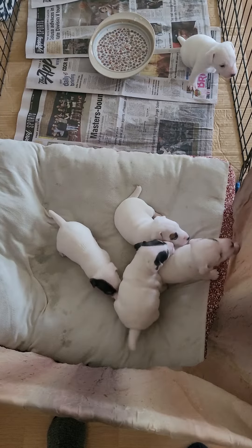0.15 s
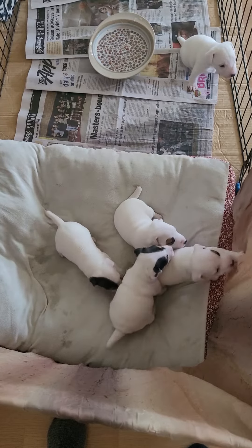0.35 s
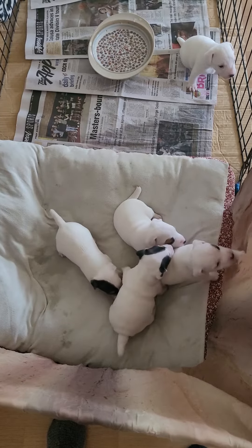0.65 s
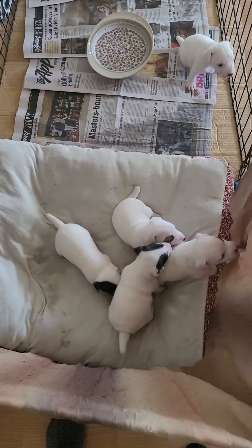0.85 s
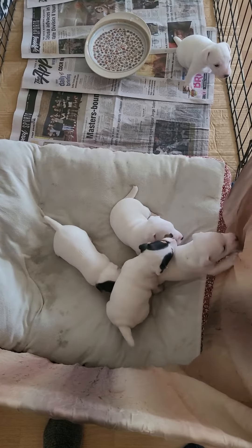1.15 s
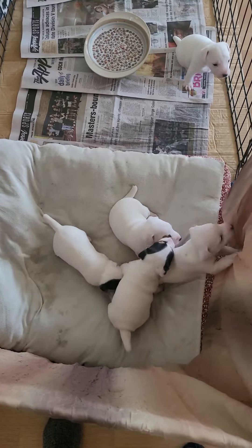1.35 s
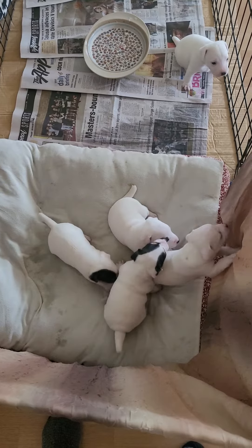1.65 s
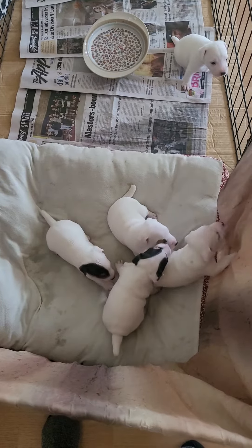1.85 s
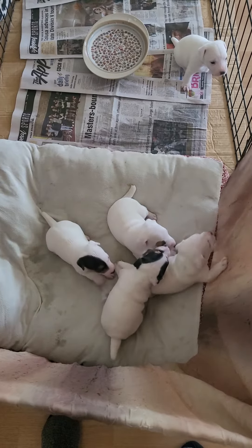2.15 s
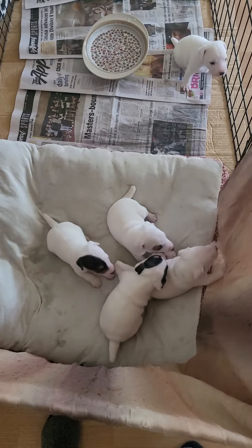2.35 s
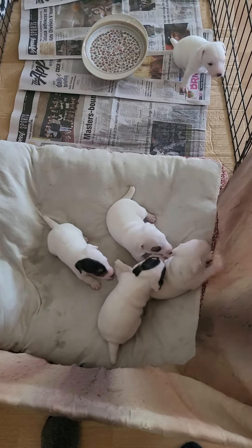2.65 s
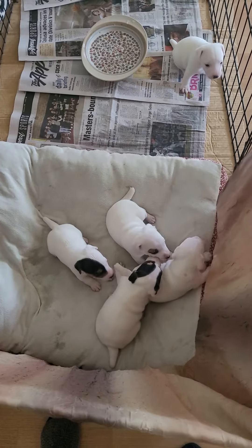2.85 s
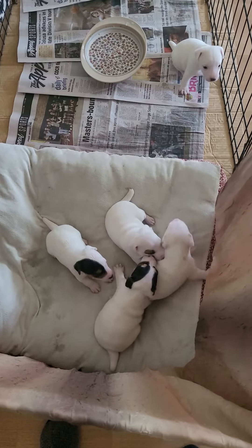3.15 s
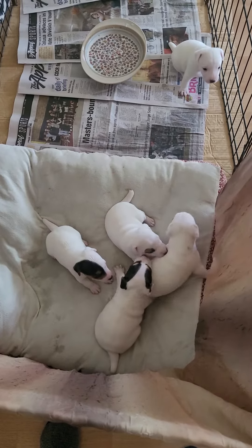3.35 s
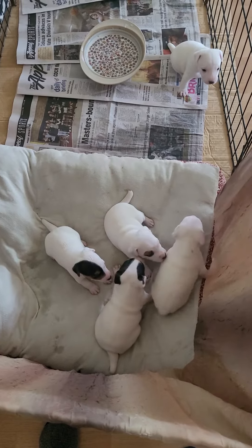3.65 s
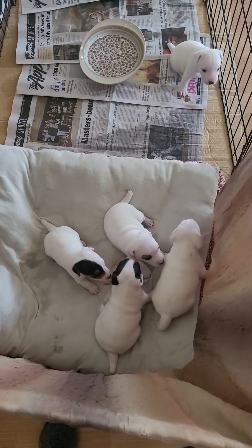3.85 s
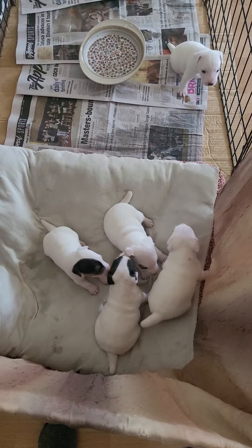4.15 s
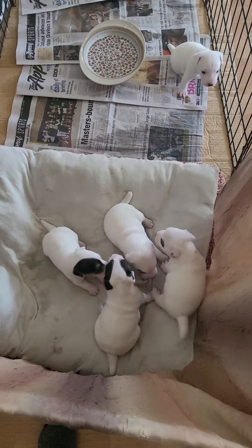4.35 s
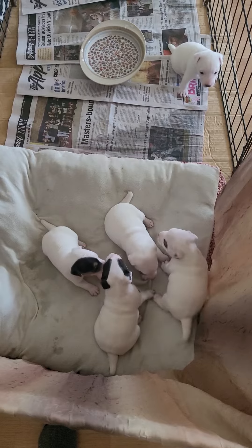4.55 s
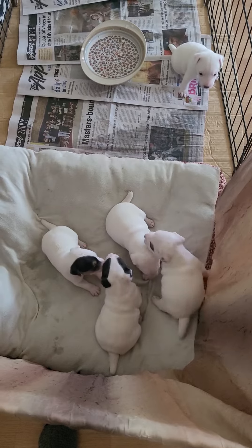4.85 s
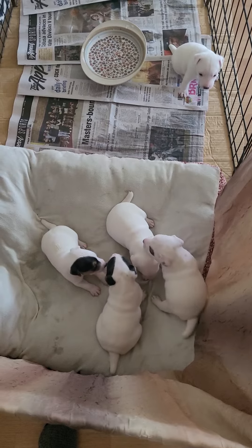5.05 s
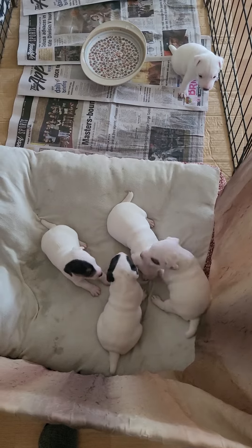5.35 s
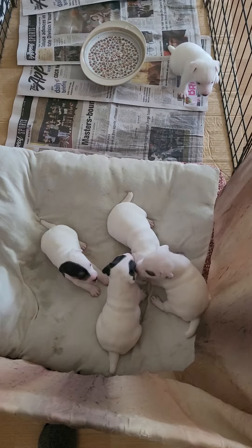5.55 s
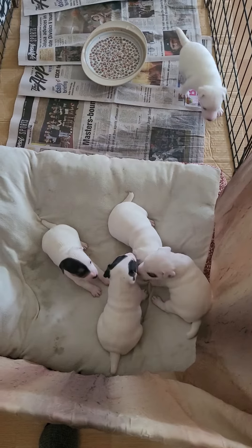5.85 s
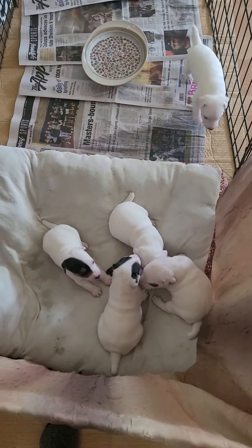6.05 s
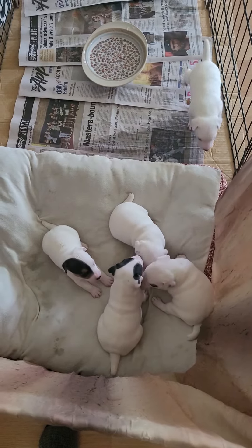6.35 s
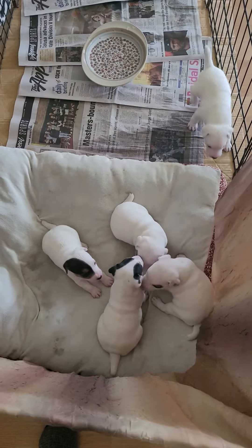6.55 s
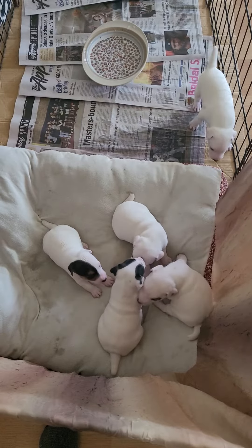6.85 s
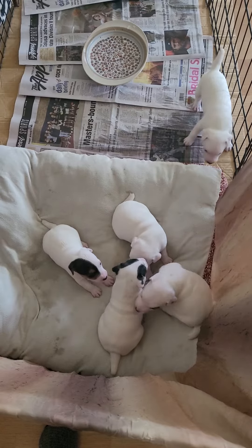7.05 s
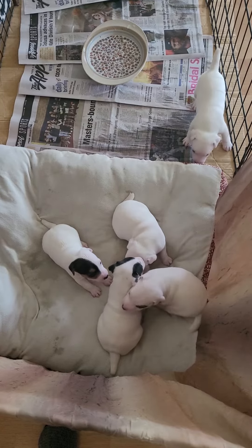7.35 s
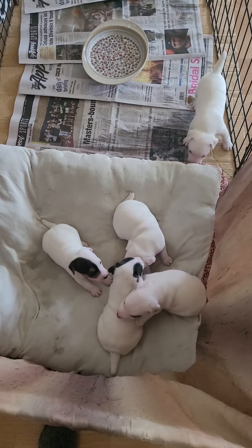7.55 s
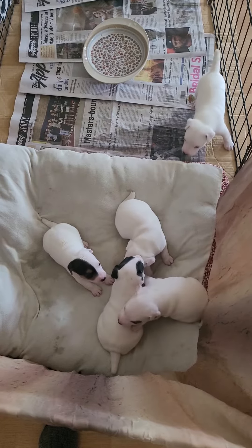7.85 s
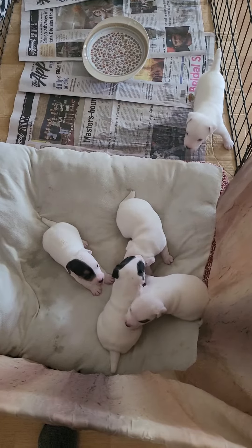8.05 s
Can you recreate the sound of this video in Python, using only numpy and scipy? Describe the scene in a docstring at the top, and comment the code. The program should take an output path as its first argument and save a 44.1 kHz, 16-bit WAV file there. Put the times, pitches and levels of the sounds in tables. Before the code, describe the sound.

Several young puppies whimper close to a phone's stereo microphone in a quiet indoor pen. Tiny pure squeaks come singly and in flurries, some stretching into short wavering whines; the strongest rises and drops just after three seconds. Later come low grunts, soft huffs, scuffs on cushion and newspaper, and small dry ticks. More whimpers close the stretch over a low, faintly hissing room hum.

```python
"""Young puppies whimper through the nose in short whistling notes, close to a phone's two microphone ports.
They lie on a cushion in an indoor pen. Each whimper is a near-pure tone with octave, overtones and breath hiss.
Low grunts are rough harmonics; huffs, scuffs on cloth and newspaper and small ticks are shaped noise.
Behind them a quiet room hums, and its walls answer the pups with a short decaying tail."""
import sys
import numpy as np
from scipy import signal
from scipy.fft import rfft, irfft, next_fast_len
from scipy.io import wavfile
from scipy.ndimage import uniform_filter1d, map_coordinates

SR = 44100
rng = np.random.default_rng(int(sys.argv[2]) if len(sys.argv) > 2 else 0)


def pcm_store(signal):
    """Save signal as 16-bit PCM."""
    levels = np.round(np.clip(np.atleast_2d(signal), -1, 1) * 32767)
    wavfile.write(sys.argv[1], SR, levels.astype(np.int16).T)


N = 361619
TIME = np.arange(N) / SR
TOP_HZ = 15830  # band limit of voices and microphone

# whimpers, one curve each: time_s [s], pitch_hz [Hz], level_db [dB]
WHIMPERS = [
    [(0.006, 1039, -48), (0.028, 965, -44), (0.04, 956, -48)],
    [(0.216, 861.5, -39), (0.243, 853, -37.5), (0.256, 840, -47.5)],
    [(1.614, 989, -48.5), (1.634, 926, -41), (1.646, 918, -49)],
    [(1.868, 952.6, -50), (1.892, 936, -43.5), (1.903, 926, -34)],
    [(2.454, 981, -50.5), (2.474, 1022, -56), (2.484, 988, -55)],
    [(3.834, 1215, -47.5), (3.844, 1162, -43.5), (3.864, 1057, -47.5)],
    [(3.868, 1108, -45), (3.88, 1090, -50), (3.893, 1070, -54)],
    [(4.396, 890, -36.5), (4.402, 857, -39), (4.414, 913, -61)],
    [(4.835, 907, -52.5), (4.846, 858, -48), (4.88, 842, -51)],
    [(6.094, 864, -49.5), (6.108, 835, -51.5), (6.14, 824, -48)],
    [(1.81, 1163, -50.5), (1.83, 1128, -48), (1.866, 1037, -49)],
    [(3.908, 1140, -52.5), (3.938, 1232, -43.5), (3.972, 1088, -50.5)],
    [(3.981, 1130, -47.5), (4.009, 1125, -46.5), (4.035, 968, -49.5)],
    [(5.815, 1190, -73), (5.839, 1069, -56.5), (5.858, 1213, -65)],
    [(7.544, 1242, -41.5), (7.562, 1009, -34), (7.597, 1098, -42)],
    [(7.768, 1124, -38), (7.784, 924.4, -35), (7.812, 971, -37)],
    [(5.866, 1670, -79.5), (5.88, 1563, -58), (5.905, 1570, -70.5)],
    [(2.077, 1221, -46.5), (2.1, 1212, -41.5), (2.14, 1297, -40.5), (2.162, 1246, -39), (2.178, 1175, -42),
     (2.206, 1193, -42.5)],
    [(2.486, 1025, -42.5), (2.522, 1303, -41), (2.555, 1247, -40.5), (2.61, 1393, -40),
     (2.675, 1369, -38.5), (2.694, 1321, -42.5)],
    [(3.546, 1261, -47.5), (3.575, 1273, -42), (3.6, 1369, -39), (3.63, 1330, -39), (3.645, 1164, -47),
     (3.655, 1134, -44.5)],
    [(4.2, 1160, -54), (4.24, 1103, -46), (4.275, 1170, -48), (4.3, 1046, -42.5), (4.33, 1001, -43.5),
     (4.35, 864, -50)],
    [(7.997, 897, -43), (8.012, 785, -46), (8.035, 887, -35), (8.062, 1135, -37), (8.074, 1163, -37),
     (8.086, 953, -45)],
    [(2.886, 1405, -44), (2.91, 1480, -39.5), (2.935, 1661, -45), (2.99, 1677, -44), (3.05, 1709, -38.5),
     (3.074, 1675, -40), (3.085, 1377, -43)],
    [(3.236, 1477, -43.5), (3.26, 1651, -35.5), (3.295, 1769, -34.5), (3.335, 1717, -31.5),
     (3.366, 1650, -29.5), (3.381, 1540, -33.5), (3.394, 1302, -38.5)],
    [(5.418, 1618, -50.5), (5.44, 1636, -45.5), (5.45, 1730, -49.5), (5.46, 1768, -41.5), (5.47, 1797, -52),
     (5.482, 1810, -46.5), (5.497, 1770, -56)],
    [(7.132, 1320, -54), (7.19, 1457, -50.5), (7.22, 1575, -45.5), (7.238, 1535, -50), (7.252, 1622, -41),
     (7.28, 1673, -40.5), (7.322, 1692, -45)],
]
# voice of each whimper in order of time: left_minus_right_db [dB], octave_db over the nose's rule [dB],
# high_overtones_db [dB]
WHIMPER_VOICES = [(-1.5, 5, -56.5), (-2.5, -13, -56), (-2, -5, -63), (-2.5, -3, -62.5), (-3, -1.5, -68.5),
                  (2, -2.5, -55.5), (-3.5, 9.5, -57), (3, 6, -57.5), (0, 1.5, -51), (2, -2.5, -49),
                  (3, 2.5, -58), (2.5, -11, -66), (-3.5, -4, -70), (3, -1.5, -63.5), (3.5, -2, -63.5),
                  (2.5, -5, -65), (-3, -15.5, -70), (-3, -18, -76.5), (-2.5, 7, -56), (-9, -18, -73),
                  (-2, -3, -55), (-2.5, -16, -72), (-7.5, 4.5, -58), (-7.5, 1, -57.5), (-8.5, 0.5, -56),
                  (-5.5, -3, -60)]
# octave's level against the fundamental: octave_hz [Hz], gain_db [dB]
NOSE_OCTAVE = [(1500, -1), (2050, -14), (2500, -27.5), (3500, -35.5)]
# colour of the high overtones: freq_hz [Hz], gain_db [dB]
NOSTRIL_OVERTONES = [(3180, -66), (5400, -23.5), (6600, 0.5), (6970, -7.5), (8400, -26.5), (10300, -5.5),
                     (11700, -9), (12800, -12), (14800, -4), (16000, -13)]
# colour of the breath hiss: freq_hz [Hz], gain_db [dB]
BREATH_COLOUR = [(1000, -2), (2100, -14.5), (3000, -18.5), (5200, -20.5), (6700, 0), (8600, -25.5),
                 (10800, -1.5), (12600, -5), (14600, -2)]
WHIMPER_ATTACK_S, WHIMPER_RELEASE_S = .009, .009
LAG_S_PER_DB = -.000012  # the quieter port hears it later
# hiss over the overtones of a 1200 Hz cry; high cries leak less air
BREATH_DB, BREATH_DB_PER_OCTAVE = -2.5, -13


def whimpers():
    """A nearly pure whistle with its octave; the narrow nostrils add high overtones and breath hiss."""
    out, airflow = np.zeros((2, N)), np.zeros(N)
    for rows, (pan_db, octave_db, high_db) in zip(sorted(WHIMPERS), WHIMPER_VOICES):
        first, fade, hz, db = phrase(rows, WHIMPER_ATTACK_S, WHIMPER_RELEASE_S)
        size = len(hz)
        span = slice(first, first + size)
        hz = hz * (1 + .005 * wobble(50, size))
        db = db + 1.1 * wobble(55, size)
        effort_db = db - db.max()

        tone, octave = overtones(hz, NOSE_OCTAVE, jitter=.007, count=2)
        # turbulence smears the tone a little and the octave more
        tone *= (1 + .1 * wobble(400, size)) / amp(along(NOSE_OCTAVE, hz))
        octave *= amp(octave_db + .4 * effort_db) * (1 + .5 * wobble(350, size))

        flicker = np.array([amp(5 * wobble(45, size)) for _ in range(20)])
        high = flicker * overtones(hz, NOSTRIL_OVERTONES, jitter=.0045, count=20)
        high = high[2:].sum(0)  # third harmonic and up
        # the overtones follow the effort less steeply than the tone does
        high = amp(high_db + 0.59 * effort_db) * unit(high)

        cry = fade * (amp(db) * (tone + octave) + high)
        out[:, span] += placed(cry, pan_db, lag_s=LAG_S_PER_DB * pan_db)
        leak_db = BREATH_DB + BREATH_DB_PER_OCTAVE * np.log2(hz.mean() / 1200)
        airflow[span] = amp(high_db + leak_db + 0.12 * effort_db)

    # air leaks a little before the folds start and for a moment after they stop
    linger = np.exp(-TIME[:SR // 10] / .016)
    airflow = signal.fftconvolve(airflow, linger / linger.sum())[300:N + 300]
    airflow = uniform_filter1d(airflow, size=SR // 40)
    hiss = patchy(noise(BREATH_COLOUR, (2, N)), 2.5, bins=16, frames=6)
    return out + airflow * amp(2 * wobble(23, N)) * hiss


# low grunts and moans, one curve each: time_s [s], pitch_hz [Hz], level_db [dB]
GRUNT_CURVES = [
    [(.9, 365, -81), (1.0, 551, -63.5), (1.08, 695, -67.5), (1.14, 782, -69.5), (1.22, 825, -74)],
    [(2.39, 315, -69.5), (2.45, 304, -61)],
    [(3.085, 348, -61), (3.113, 394, -59.5), (3.165, 296.5, -60.5), (3.197, 316, -59), (3.239, 404, -54),
     (3.267, 384, -55), (3.337, 405, -51), (3.365, 343.3, -61.5), (3.393, 269, -62), (3.42, 218, -57)],
    [(5.185, 286, -69.5), (5.227, 278, -64.5)],
    [(5.24, 278.6, -64), (5.295, 274, -65.5)],
    [(5.313, 359.5, -59), (5.364, 385, -65)],
    [(5.735, 291, -68.5), (5.8, 269.4, -61), (5.845, 310, -57.5)],
    [(5.878, 394, -61), (5.895, 348, -56.5), (5.912, 420, -53)],
    [(6.31, 365, -68), (6.354, 341, -64.5)],
    [(6.385, 393, -54), (6.447, 376, -53)],
    [(6.441, 359, -61.5), (6.489, 366, -53.5)],
]
# one value per grunt: overtone_tilt [dB per octave]
GRUNT_TILTS = [5.5, -8, -2.5, -2, -0.5, -4, -3, -1.5, -1.5, -8.5, -3.5]
# colour given by chest and throat: freq_hz [Hz], gain_db [dB]
CHEST_COLOUR = [(250, 4), (310, 8), (420, -13.5), (560, -2), (850, -4), (1200, -20), (1800, -27.5),
                (2300, -45)]
GRUNT_FADE_S, GRUNT_WAVERS_DB = .014, 1.5
GRUNT_ROUGH = .45  # 0-1


def grunts():
    """Closed-mouth murmurs: soft harmonics through chest and throat, a little rough."""
    out = np.zeros(N)
    for rows, tilt_db in zip(GRUNT_CURVES, GRUNT_TILTS):
        first, fade, hz, db = phrase(rows, GRUNT_FADE_S, GRUNT_FADE_S)
        size = len(hz)
        tilt = amp(tilt_db * np.log2(np.arange(1, 8)))[:, None]
        # each overtone comes and goes
        tilt = tilt * [amp(7 * GRUNT_ROUGH * wobble(45, size)) for _ in tilt]
        harmonics = overtones(hz, CHEST_COLOUR, jitter=.06 * GRUNT_ROUGH, count=7)
        voice = (tilt * harmonics).sum(0) * amp(6 * GRUNT_ROUGH * wobble(120, size))
        level = amp(db + GRUNT_WAVERS_DB * wobble(26, size))
        out[first:first + size] += fade * level * voice
    return placed(out, -0.41, lag_s=-0.000092)


# voiceless huffs and croaks: start_s [s], length_s [s], level_db [dB], centre_hz [Hz], width_hz [Hz]
HUFF_EVENTS = [(1.566, 0.15, -61.5, 624, 525), (4.393, 0.041, -54, 570, 515), (4.457, 0.051, -51, 827, 900),
               (5.315, 0.11, -67, 1890, 1020), (6.616, 0.15, -65.5, 910, 536), (6.882, 0.18, -65, 884, 300)]


def huffs():
    """Air pushed out without a tone: lumpy noise in one throat resonance."""
    out = np.zeros(N)
    for start_s, length_s, db, centre_hz, width_hz in HUFF_EVENTS:
        size = round(length_s * SR)
        air = rng.standard_normal(size) * amp(2.5 * wobble(110, size))
        air = filtered(air, lambda hz: 1 / (1 + ((hz - centre_hz) / (width_hz / 2)) ** 2) ** 2)
        fade = signal.windows.tukey(size, .6)
        out[round(start_s * SR):][:size] += amp(db) * fade * unit(air)
    return placed(out, -0.78, lag_s=.00005)


# claw and mouth ticks: start_s [s], level_db before rise and decay [dB], centre_hz [Hz]
TICK_EVENTS = [(1.0223, -44.5, 2060), (2.0677, -56, 2560), (2.4046, -56.5, 13480), (2.6278, -48, 2540),
               (2.6614, -51.5, 2720), (2.7516, -53, 13650), (4.9726, -54, 5750), (5.564, -52, 4466),
               (5.6131, -42.5, 13000), (5.7797, -54.5, 14640), (6.2745, -57.5, 6220), (6.327, -52.5, 3960),
               (6.349, -45.5, 3800), (6.36, -45, 3800), (6.4974, -54.5, 11500), (8.074, -48.5, 13530),
               (7.717, -57, 3230)]
# band over its centre, dying time, rise
TICK_WIDTH, TICK_T60_S, TICK_RISE_S = .5, .016, .0012


def ticks():
    """Each tick is a dry crack of noise, strongest in a wide band round its centre."""
    out, t = np.zeros(N + SR), TIME[:SR // 50]
    for start_s, db, centre_hz in TICK_EVENTS:
        half_width_hz = TICK_WIDTH * centre_hz / 2
        crack = filtered(rng.standard_normal(len(t)),
                         lambda hz: 0.051 + 1 / (1 + ((hz - centre_hz) / half_width_hz) ** 2))
        envelope = amp(db - 60 * t / TICK_T60_S) * (1 - np.exp(-t / TICK_RISE_S))
        out[round(start_s * SR):][:len(t)] += envelope * unit(crack)
    out = filtered(out, lambda hz: 1 / (1 + (1500 / (hz + 1)) ** 4))  # thin out the lows
    return placed(out[:N], -9.0, lag_s=-0.000035)


# scuffs on the bedding: start_s [s], length_s [s], cloth_db [dB], paper_db [dB]
SCUFF_EVENTS = [(0.074, 0.26, -60.5, -78.5), (1.219, 0.17, -66, -74), (1.745, 0.27, -65.5, -66),
                (3.948, 0.19, -66.5, -72), (4.319, 0.204, -78, -62), (4.819, .18, -83.5, -70),
                (5.302, 0.15, -67.5, -85), (5.456, 0.28, -71.5, -60), (5.61, 0.053, -78, -51.5),
                (5.758, 0.11, -66, -60.5), (5.954, 0.036, -64, -50), (6.074, 0.17, -80.5, -64),
                (6.291, 0.16, -70, -63), (6.486, 0.12, -66, -59), (6.613, 0.16, -65, -65.5),
                (7.323, 0.05, -91, -60.5), (8.149, 0.046, -65, -65)]
# colour of rubbed cloth: freq_hz [Hz], gain_db [dB]
CLOTH_COLOUR = [(880, -36), (1500, -10), (2590, -18.5), (3770, -14), (5600, -22.5), (7280, -27),
                (12300, -120)]
# colour of rubbed newspaper: freq_hz [Hz], gain_db [dB]
PAPER_COLOUR = [(3060, -38), (5200, -2.5), (7680, 4), (8400, -5), (14300, 5.5), (16000, -5)]
SCUFF_RISE, SCUFF_FADE_DB = .42, 12  # share of the length spent rising, loss over the whole


def shuffling():
    """Paws and bellies rub the bedding: each scuff rises, then fades, as noise broken into clumps of grains."""
    cloth, paper = np.zeros((2, N))
    for start_s, length_s, cloth_db, paper_db in SCUFF_EVENTS:
        first, t, elapsed, fade = note(start_s, length_s, SCUFF_RISE * length_s, length_s / 2)
        stroke = fade * amp(-SCUFF_FADE_DB * elapsed)
        cloth[first:first + len(t)] += amp(cloth_db) * stroke
        paper[first:first + len(t)] += amp(paper_db) * stroke
    grains = unit(amp(1.5 * wobble(45, N) + 2.5 * wobble(500, N)))
    rub = cloth * noise(CLOTH_COLOUR, (2, N)) + paper * noise(PAPER_COLOUR, (2, N))
    return patchy(grains * rub, 3, bins=12, frames=5)


# decay of the pen's room: freq_hz [Hz], t60_s [s]
ROOM_DECAY = [(1000, 0.34), (2000, 0.36), (7000, 0.075), (15000, 0.3)]


def room(x):
    """Each frequency of the walls' answer dies at its own speed."""
    hz, t, z = signal.stft(rng.standard_normal((2, SR * 2 // 3)), SR, nperseg=256)
    decay = amp(-60 * t / along(ROOM_DECAY, hz)[:, None])
    tail = signal.istft(z * decay, SR, nperseg=256)[1]
    late = np.pad(x.mean(0), (300, 0))[None]  # the answer starts 300 samples late
    return signal.fftconvolve(late, tail / np.linalg.norm(tail[0]), axes=1)[:, :N]


# colour of the room and microphone floor: freq_hz [Hz], gain_db [dB]
FLOOR_COLOUR = [(21, -20), (39, -12), (50, 2.5), (100, -4.5), (250, -2.5), (331, -5), (627, -20.5),
                (830, -21.5), (2490, -36.5), (5210, -40.5), (6550, -32.5), (8670, -39.5), (13700, -33.5),
                (16000, -37)]
# left-right likeness of the floor: freq_hz [Hz], likeness [0-1]
FLOOR_LIKENESS = [(60, 0.99), (300, 0.87), (700, 0.68), (1400, 0.27), (15000, 0.041)]
# the rumble grows briefly: peak_s [s], gain_db [dB]
RUMBLE_SWELLS = [(.68, 9), (1.57, 12), (1.9, 10), (2.12, 5.5), (3.35, 10), (4.0, 11), (4.47, 9), (6.051, 8),
                 (8.05, 6)]
HUM_DB, SWELL_S = -62.5, .09  # floor level; half width of a swell


def hum():
    """Low rumble mostly shared by both ports, nearly unrelated patchy hiss above; now and then the rumble
    swells briefly."""
    pair = patchy(noise(FLOOR_COLOUR, (2, N)), 2.2, bins=10, frames=16)

    def mid_side_gains(hz):
        turn = np.arccos(np.clip(along(FLOOR_LIKENESS, hz), -1, 1)) / 2
        return np.array([np.cos(turn), np.sin(turn)])

    mid, side = filtered(pair, mid_side_gains)
    pair = np.array([mid + side, mid - side])
    bass = filtered(pair, lambda hz: 1 / (1 + (hz / 110) ** 4))
    swell_db = sum(db * np.exp(-((TIME - peak_s) / SWELL_S) ** 2) for peak_s, db in RUMBLE_SWELLS)
    swell = amp(1.0 * wobble(5.2, N) + swell_db)
    return amp(HUM_DB) * (pair + (swell - 1) * bass)


def phrase(rows, attack_s, release_s):
    """First sample, fade, pitch and level of a call, its corners rounded."""
    s, hz, db = np.transpose(rows)
    first, t, _, fade = note(s[0] - attack_s / 2, s[-1] - s[0] + attack_s / 2, attack_s, release_s)
    hz, db = (uniform_filter1d(np.interp(t + first / SR, s, v), size=SR // 120) for v in (hz, db))
    return first, fade, hz, db


def note(start_s, length_s, attack_s, release_s):
    """First sample, seconds into the note, share of it elapsed, and a rounded fade at both ends."""
    first = max(round(start_s * SR), 0)
    t = TIME[:min(round((length_s + release_s / 2) * SR), N - first)]
    edge = np.clip(np.minimum(t / attack_s, (length_s - t) / release_s + .5), 0, 1)
    return first, t, t / length_s, np.sin(edge * np.pi / 2) ** 2


def overtones(hz, colour, jitter, count):
    """Harmonics of an unsteady pitch, one row each, with the gain of the colour at their frequency."""
    k = np.arange(1, count + 1)[:, None]
    phase = 2 * np.pi * np.cumsum(hz * (1 + jitter * wobble(150, len(hz)))) / SR
    gain = amp(along(colour, k * hz)) * (k * hz < TOP_HZ)
    return gain * np.sqrt(2) * np.sin(k * phase)  # sqrt(2): rms 1 before the gain


def placed(x, pan_db, lag_s):
    """A source between two microphone ports: level and arrival differ."""
    side = np.array([[.5], [-.5]])  # left, right
    return filtered(x, lambda hz: amp(pan_db * side) * np.exp(-2j * np.pi * hz * lag_s * side))


def patchy(x, depth_db, bins, frames):
    """x with patches of random gain over time and frequency."""
    _, _, z = signal.stft(x, SR, nperseg=512)
    field = uniform_filter1d(rng.standard_normal(z.shape[1:]), size=bins, axis=0)
    field = uniform_filter1d(field, size=frames, axis=1)
    return signal.istft(z * amp(depth_db * unit(field)), SR, nperseg=512)[1][:, :N]


def noise(spectrum, shape):
    """Coloured noise of rms 1."""
    return unit(filtered(rng.standard_normal(shape), lambda hz: amp(along(spectrum, hz))))


def wobble(rate, size):
    """A smooth random curve, rate knots a second."""
    knots = rng.standard_normal(int(size * rate / SR) + 4)
    return map_coordinates(knots, [np.arange(size) * rate / SR])


def filtered(x, response):
    """x times a response of frequency."""
    m = next_fast_len(x.shape[-1] + 8192)  # padded so the ends do not wrap round
    return irfft(rfft(x, m) * response(np.fft.rfftfreq(m, 1 / SR)), m)[..., :x.shape[-1]]


def along(points, hz):
    """(Hz, value) points read on a log frequency axis."""
    f, v = np.transpose(points)
    return np.interp(np.log(hz + 1), np.log(f + 1), v)


def amp(db):
    """Decibels to linear gain."""
    return 10 ** (np.asarray(db) / 20)


def unit(x):
    """x scaled to rms 1."""
    return x / np.sqrt(np.mean(x ** 2) + 1e-20)


def scene():
    """The pups and the room's answer to them, over the shuffling and the hum."""
    pups = whimpers() + grunts() + huffs() + ticks()
    return pups + amp(-9.0) * room(pups) + shuffling() + hum()


# colour difference of the microphone ports: freq_hz [Hz], left_minus_right_db [dB]
PORT_COLOUR = [(60, -7), (200, -1.5), (700, -9), (2400, -1.5), (5000, -5), (7500, -6), (13000, -12.5)]


def record(dry):
    """The two ports face different ways and differ in colour; nothing is kept above the band limit."""
    side = np.array([[.5], [-.5]])  # left, right
    return filtered(dry, lambda hz: amp(along(PORT_COLOUR, hz) * side) * (hz < TOP_HZ))


dry = scene()
out = record(dry)
pcm_store(out)
```